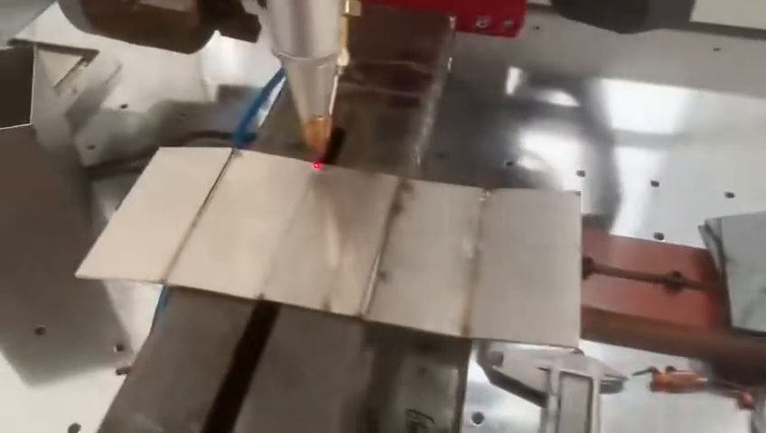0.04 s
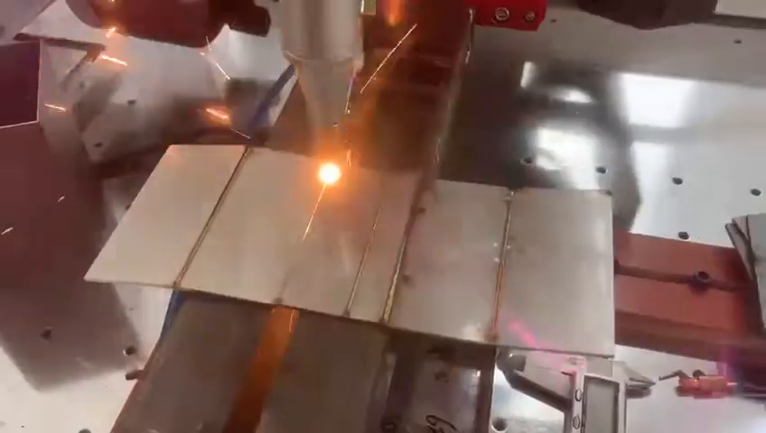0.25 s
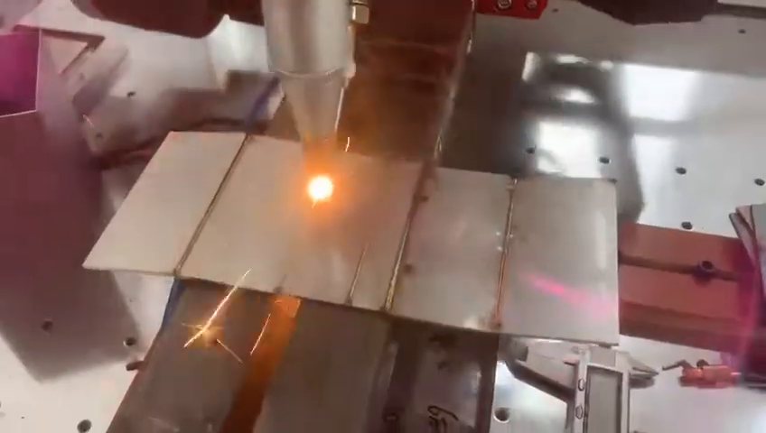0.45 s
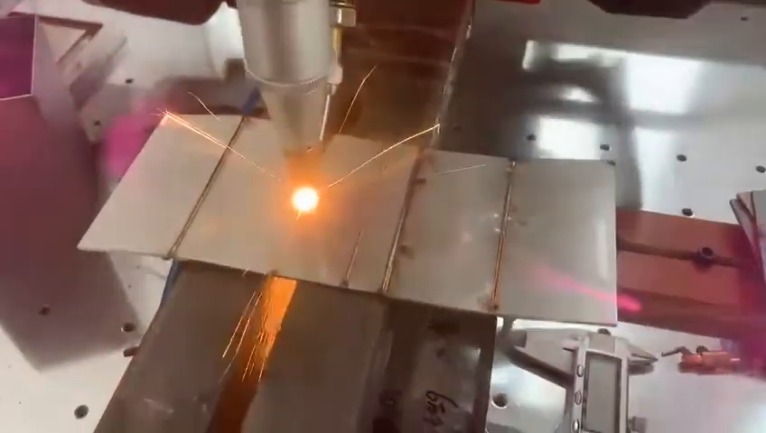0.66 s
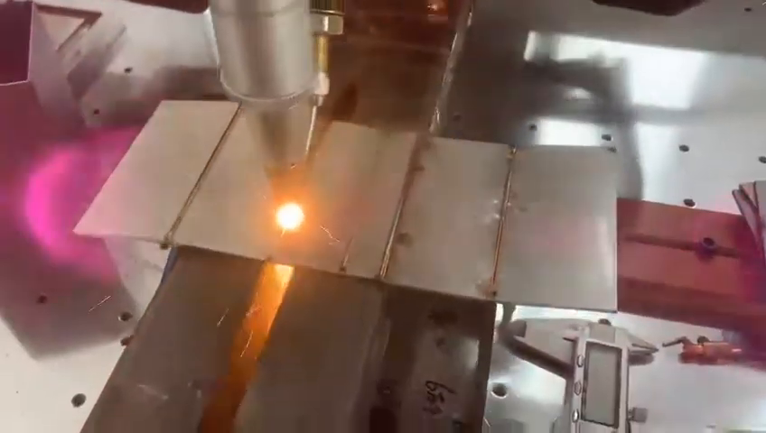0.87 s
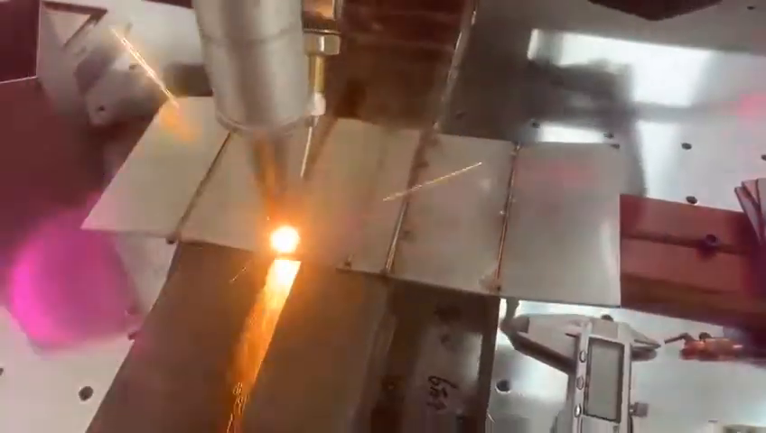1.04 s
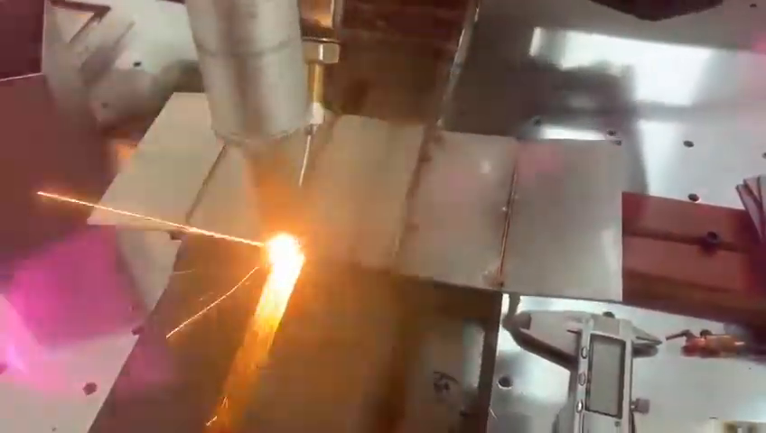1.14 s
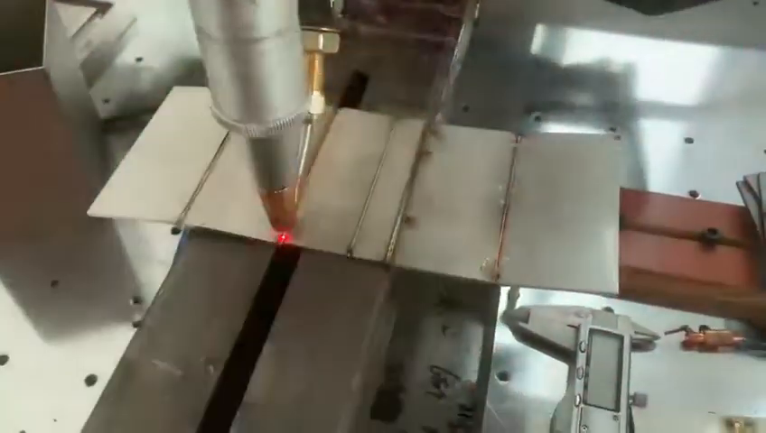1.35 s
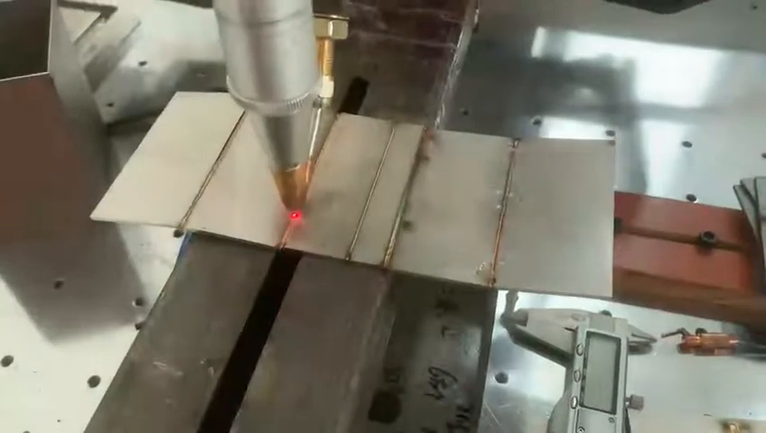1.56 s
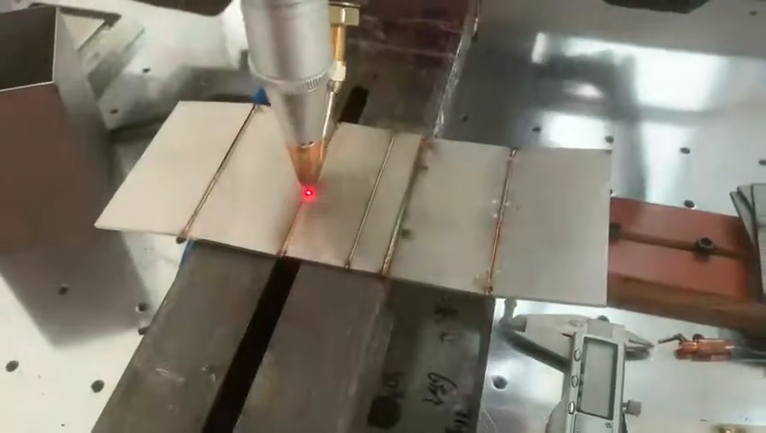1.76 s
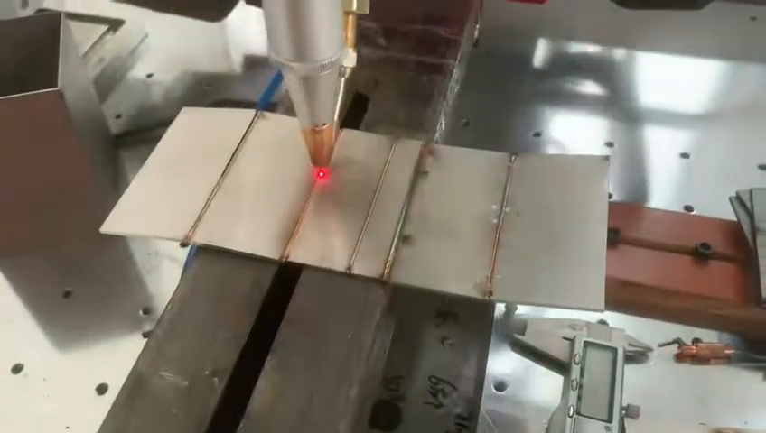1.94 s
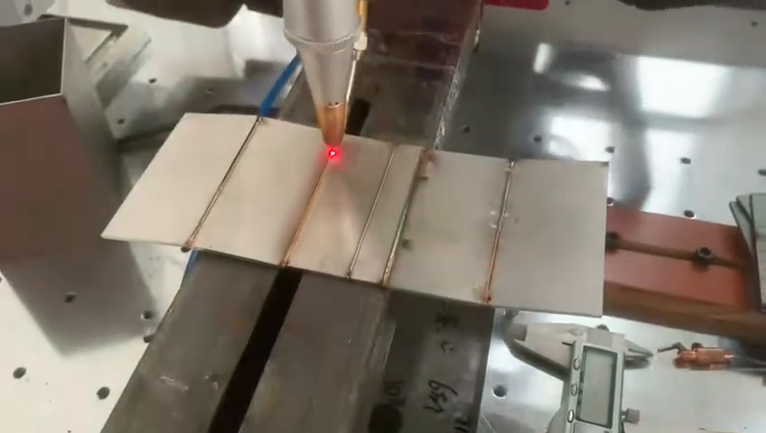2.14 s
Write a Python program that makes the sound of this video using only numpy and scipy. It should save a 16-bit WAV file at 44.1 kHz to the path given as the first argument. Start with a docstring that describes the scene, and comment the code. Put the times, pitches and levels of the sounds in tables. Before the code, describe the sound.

A laser welder on thin sheet metal, heard close. Faint workshop hum until 0.13 seconds, then a sharp spitting burst and small sheet thumps. A rough, rapidly fluttering electric buzz and crackly hiss carry a piercing steady whistle near ten kilohertz and a fainter five-kilohertz tone, wavering slightly. Thumps at 1.15 and 1.2 mark the abrupt stop; a short bright echo fades into quiet, slowly recovering hum until about 2 seconds.

```python
"""A buzzing hiss with a high whistle runs for about a second over workshop hum; thumps mark its start and end.
A pulsed laser welder runs along a seam in thin sheet metal: the vapour jet is shaped noise with spatter clicks,
the pulse rate whistles as sine tones, and the side-to-side swing of the beam chops both into a buzz.
The sheet is a set of struck modes; the workshop is noise and wavering sines, ducked by the recorder's
gain control."""
import sys
import numpy as np
from scipy import signal
from scipy.fft import rfft, irfft
from scipy.io import wavfile
from scipy.ndimage import uniform_filter1d

SR = 44100
rng = np.random.default_rng(int(sys.argv[2]) if len(sys.argv) > 2 else 0)


def store_pcm(level_fs):
    """Save levels as 16-bit WAV."""
    pcm = np.round(np.clip(level_fs, -1, 1) * 32767).astype(np.int16)
    wavfile.write(sys.argv[1], SR, np.atleast_2d(pcm).T)


N = 97020

# Workshop noise spectrum. Each row: frequency in Hz, relative density in dB per Hz.
SHOP_SPECTRUM = [(15, -41), (25, -7.5), (161, -7.5), (229, -11), (416, -3), (476, -9.5), (1700, -18.5),
                 (4250, -32.5), (7310, -42.5), (8140, -36.5), (16000, -68.5)]
# Hum of other machines. Each row: frequency in Hz, rms phase wander in radians, level in dB.
MACHINE_HUMS = [(168.2, 3.8, -54.5), (291, 5.9, -47.5), (417, 3, -47.5), (839, 3, -53), (2380, 12, -64),
                (8030, 5, -68)]
# Room tail. Each row: frequency in Hz, level in dB, t60 in seconds.
ROOM_TAIL = [(250, -21, .4), (1000, -13, 0.96), (2500, -12.5, 1), (5000, -16, 0.82), (8000, -22.5, 0.52),
             (9900, -20.5, .65), (12600, -24.5, .55), (15500, -25, .25)]
# Flexing of the sheet. Each row: time in seconds, level in dB.
SHEET_THUMPS = [(0.135, -30.5), (0.147, -27.5), (0.167, -30), (1.151, -25.5), (1.198, -21)]
# Modes of the sheet. Each row: frequency in Hz, level in dB, t60 in seconds.
SHEET_MODES = [(130, -2.5, 0.053), (230, -10, .1), (312, 1, .1), (408, -1, .1), (795, -9.5, .12),
               (940, -9.5, .1), (1131, -9, .12), (1350, -20, .08)]
# Course of the weld. Each row: time in seconds, hiss in dB, high whistle in dB, pulse tone in dB,
# low buzz in dB, swing tones from the seventh up in dB, depth of the once-a-swing chop (0-1).
WELD_COURSE = [(.133, -32.5, -22, -1, 12.5, -15, .1), (0.14, -20, -5.5, 5.5, 7, -3, 0.2),
               (.155, -11.5, -34, 9.5, 2.5, -27, 0.17), (0.181, -19.5, -2, -1, -2, -33, 0),
               (.23, -21.5, -5, -3, -2, -9, .1), (.3, -20, 2, -4, 2.5, 4, 0.17),
               (0.432, -17, 3, 3, 0, 3.5, 0.36), (.55, -13.5, 3.5, 4, 0.5, 7.5, 0),
               (.59, -12, 3, 3.5, -1.5, 0, 0.17), (.63, -14, 5.5, -2, 3.5, 11.5, 0),
               (.68, -11, 2.5, 7, -3, 5.5, 0.2), (.71, -14.5, 1, 4, -4.5, 1.5, 0.54),
               (.77, -15, 2.5, 3, -3.5, 3.5, 0), (.86, -13.5, 2.5, 2.5, -2, 1.5, 0.3),
               (.93, -15, 3.5, 6, -0.5, 9, 0), (.96, -14.5, -1, -2, 0, -3, 0),
               (1.01, -16, 2, 4, -0.5, 8, 0), (1.07, -14.5, 1, 7, -2, -1, 0),
               (1.13, -14.5, -4.5, 8.5, -3, -7, 0), (1.159, -16, 2.5, 11.5, 4, 16, 0.35),
               (1.196, -14.5, -8, 12, 1, -35, .9)]
# Hiss spectrum. Each row: frequency in Hz, relative density in dB per Hz.
HISS_SPECTRUM = [(35, -65), (60, -35), (185, -32), (239, -22.5), (430, -21), (472, -20.5), (655, -42.5),
                 (828, -12.5), (910, -22.5), (1100, -15.5), (1630, -30.5), (2320, -21), (2550, -19.5),
                 (2940, -20.5), (3710, -23.5), (5160, -12), (7500, -11), (8050, -13.5), (9260, -16),
                 (9940, -6), (11700, -20.5), (13500, -10.5), (16300, -27)]
# Narrow dips in the hiss spectrum as heard. Each row: centre in Hz, width in Hz, level in dB.
HISS_DIPS = [(1750, 150, -3), (3500, 250, -1.5), (7996, 200, -6.5), (9350, 150, -6.5), (11560, 130, -35),
             (15200, 140, -41)]
# Tones at pulse multiple * pulse rate + swing multiple * swing rate.
# Each row: one pulse multiple from 0 up; its entries: levels in dB, one per successive swing multiple.
TONE_LEVELS = [
    [-50, -40, -45, -41, -55, -55, -33, -52, -41, -50, -54, -48],
    [-35, -48, -35, -40, -31, -35, -30, -39, -48, -39, -34],
    [-42, -39, -28, -36, -13, -30, -30, -36, -32, -46, -39, -42],
    [-43, -39, -34, -39, -40],
]
# Each entry: the swing multiple at which that row of TONE_LEVELS begins.
FIRST_SWING_MULTIPLE = [1, -4, -4, -6]

SHOP_DB, SHOP_PATCHY_DB, HUM_WAVER_DB = -43.5, .6, 2.0
EARLY_DB, EARLY_S = 11, .085  # early echoes stand this far over the tail, for this long
TONES_TO_ROOM_DB = -17
LOW_CUT_HZ = 78  # the small sheet radiates no deep bass
RIPPLE_DB, RIPPLE_HZ = 1.6, 50  # many small resonances of sheet, bench and room, as a random ripple
PULSE_HZ, SWING_HZ, SWING_PEAK_S = 5004.35, 120.0, 1.183
START_S, STOP_S, ON_S, OFF_S = .1325, 1.199, .0004, .005
IGNITION_DB, IGNITION_S = 14, 0.0023
HISS_PATCHY_DB, SPATTER_PER_S, SPATTER_DB = 1.29, 2200, -9.5
CHOP_TWICE = .35  # depth of the chop at both ends of each swing, where the once-a-swing chop is 0
MID_FOLLOWS = .7  # share of the low buzz dB that the 1-4 kHz bands and the lowest swing tones follow
TONE_WAVER_DB, CARRIER_WAVER_DB, TONE_WANDER_RAD = 2.5, 2, .45
GAIN_FROM_DB, GAIN_SHARE = -37, 0.68  # threshold; dB of cut per dB over it
QUICK_SHARE, QUICK_S, SLOW_S, RECOVER_DB_PER_S = 0.26, 0.021, 0.67, 2.5
CUTOFF_HZ = 15780


def amp(db):
    """dB to gain."""
    return 10 ** (np.asarray(db) / 20)


def rms_one(x):
    """Scale to rms 1."""
    return x / np.sqrt(np.mean(x ** 2) + 1e-20)


def smooth(x, seconds):
    """One-pole low-pass."""
    r = np.exp(-1 / (max(seconds, 1e-6) * SR))
    return signal.lfilter([1 - r], [1, -r], x)


def drift(rate_hz):
    """Slow random signal of rms 1: two-pole filtered noise, computed every 40 samples."""
    step = 40
    r = np.exp(-2 * np.pi * rate_hz * step / SR)
    noise = rng.standard_normal(N // step + 2002)
    slow = signal.lfilter([1], [1, -2 * r, r * r], noise)[2000:]  # drop the settling
    return np.interp(np.arange(N) / step, np.arange(len(slow)), rms_one(slow))


def coloured(x, spectrum, patchy_db, low_db=0, dips=()):
    """Shape x to a spectrum; half-octave bands flicker, those under 4 kHz also follow low_db."""
    hz = np.arange(N // 2 + 1) * SR / N + 1e-3
    points = np.array(spectrum)
    full = rfft(x) * amp(np.interp(np.log(hz), np.log(points[:, 0]), points[:, 1]))
    for at_hz, width_hz, db in dips:
        full = full * amp(db * np.exp(-((hz - at_hz) / width_hz) ** 2))

    ripple_bins = int(RIPPLE_HZ * N / SR)
    ripple = uniform_filter1d(rng.standard_normal(len(hz)), ripple_bins)
    ripple = uniform_filter1d(ripple, ripple_bins)
    full = full * amp(RIPPLE_DB * rms_one(ripple))
    full = full / np.std(irfft(full, N))

    out = 0
    together = drift(4)
    for k in range(20):
        centre_hz = 25 * 2 ** (k / 2)
        share = np.clip(1 - np.abs(2 * np.log2(hz / centre_hz)), 0, 1)
        follows = 1 if centre_hz < 1000 else MID_FOLLOWS * (centre_hz < 4000)
        flicker_db = patchy_db * (.5 * together + drift(10))
        out = out + irfft(full * share, N) * amp(flicker_db + low_db * follows)
    return out


def shop():
    """Broad machine noise plus narrow hums, sines that waver in level and phase."""
    t = np.arange(N) / SR
    out = amp(SHOP_DB) * coloured(rng.standard_normal(N), SHOP_SPECTRUM, SHOP_PATCHY_DB)
    for hz, wander_rad, db in MACHINE_HUMS:
        level = amp(db + HUM_WAVER_DB * drift(12))
        out += level * np.sin(2 * np.pi * hz * t + wander_rad * drift(3.8))
    return out


def room(x):
    """A noise tail that dies band by band, with a shelf of early echoes from bench and near walls."""
    tail_hz, db, t60_s = np.transpose(ROOM_TAIL)
    freqs, t, cells = signal.stft(rng.standard_normal(SR), SR, nperseg=256)
    db, t60_s = [np.interp(np.log(freqs + 1), np.log(tail_hz), c)[:, None] for c in (db, t60_s)]
    early_db = EARLY_DB * np.exp(-(t / EARLY_S) ** 3)
    fade = amp(-60 * t / t60_s + early_db)
    norm = np.sqrt(t60_s * SR / np.log(1e6))  # equal energy whatever the t60
    tail = signal.istft(cells * amp(db) * fade / norm, SR, nperseg=256)[1]
    return signal.fftconvolve(x, tail)[:N]


def sheet():
    """Each thump strikes every decaying mode with a strength and sign of its own."""
    s, db = np.transpose(SHEET_THUMPS)
    out = np.zeros(N)
    for hz, level_db, t60_s in SHEET_MODES:
        strike = amp(db + level_db + rng.normal(0, 0.67, len(s)))
        clicks = np.full(N, 1e-18)
        clicks[(s * SR).astype(int)] = strike * rng.choice([-1, 1], len(s))
        r = amp(-60 / (t60_s * SR))
        w = 2 * np.pi * hz / SR
        out += signal.lfilter([0, np.sin(w)], [1, -2 * r * np.cos(w), r * r], clicks)
    return signal.sosfilt(signal.butter(2, LOW_CUT_HZ, "high", fs=SR, output="sos"), out)


def vapour_jet(t, swing, once, hiss_db, low_db):
    """Noise and spatter clicks, chopped once and twice a swing, with a flash at ignition."""
    chop = (1 + once * np.cos(swing)) * (1 + CHOP_TWICE * (1 - once) * np.cos(2 * swing))
    spatter = (rng.random(N) < SPATTER_PER_S / SR) * rng.standard_normal(N)
    jet = rng.standard_normal(N) + amp(SPATTER_DB) * rms_one(spatter)
    flash_db = IGNITION_DB * np.exp(-np.abs(t - START_S) / IGNITION_S)
    return amp(hiss_db + flash_db) * coloured(jet * chop, HISS_SPECTRUM, HISS_PATCHY_DB, low_db, HISS_DIPS)


def pulse_and_swing_tones(t, swing, once, whistle_db, pulse_db, low_db, seventh_db):
    """Sines at pulse-rate multiples offset by swing-rate multiples, wavering and chopped once a swing."""
    out = 0
    chop = 1 + once ** 2 * np.cos(swing)
    for multiple, levels in enumerate(TONE_LEVELS):
        for order, db in enumerate(levels, FIRST_SWING_MULTIPLE[multiple]):
            if (multiple, order) == (1, 0):
                follow_db = pulse_db
            elif multiple:
                follow_db = whistle_db
            elif order >= 7:
                follow_db = seventh_db
            else:
                follow_db = MID_FOLLOWS * low_db
            waver_db = (TONE_WAVER_DB if order else CARRIER_WAVER_DB) * drift(2.9)
            hz = multiple * PULSE_HZ + order * SWING_HZ
            phase = 2 * np.pi * hz * t + rng.uniform(0, 2 * np.pi)
            phase = phase + (order != 0) * TONE_WANDER_RAD * drift(6)
            out = out + amp(db + follow_db + waver_db) * np.sin(phase) * chop
    return out


def weld():
    """Jet hiss and beam tones follow the course of the weld, switched on and off together."""
    t = np.arange(N) / SR
    s, *columns = np.transpose(WELD_COURSE)
    hiss_db, whistle_db, pulse_db, low_db, seventh_db, once = [np.interp(t, s, c) for c in columns]
    swing = 2 * np.pi * SWING_HZ * (t - SWING_PEAK_S)
    hiss = vapour_jet(t, swing, once, hiss_db, low_db)
    tones = pulse_and_swing_tones(t, swing, once, whistle_db, pulse_db, low_db, seventh_db)
    gate = np.clip(np.minimum((t - START_S) / ON_S, (STOP_S - t) / OFF_S), 0, 1)
    return hiss * gate, tones * gate


def scene():
    """Weld and sheet in the room, over the workshop."""
    hiss, tones = weld()
    work = hiss + sheet()
    echoes = room(work + amp(TONES_TO_ROOM_DB) * tones)
    return (work + tones + echoes + shop())[None]


def record(dry):
    """Gain control: part of the cut comes quickly, the rest creeps in, recovery is slow; then the top is cut."""
    t = np.arange(N) / SR
    level_db = 10 * np.log10(smooth(dry[0] ** 2, .01) + 1e-12)
    over_db = np.maximum(level_db - GAIN_FROM_DB, 0)
    quick_db = smooth(smooth(over_db, QUICK_S / 2), QUICK_S / 2)
    slow_db = smooth(over_db, SLOW_S)
    wanted_db = GAIN_SHARE * (QUICK_SHARE * quick_db + (1 - QUICK_SHARE) * slow_db)
    recovery_db = RECOVER_DB_PER_S * t
    cut_db = np.maximum.accumulate(wanted_db + recovery_db) - recovery_db
    low_pass = signal.ellip(12, .5, 70, CUTOFF_HZ, fs=SR, output="sos")
    return signal.sosfilt(low_pass, dry * amp(-cut_db))


dry = scene()
out = record(dry)
store_pcm(out)
```